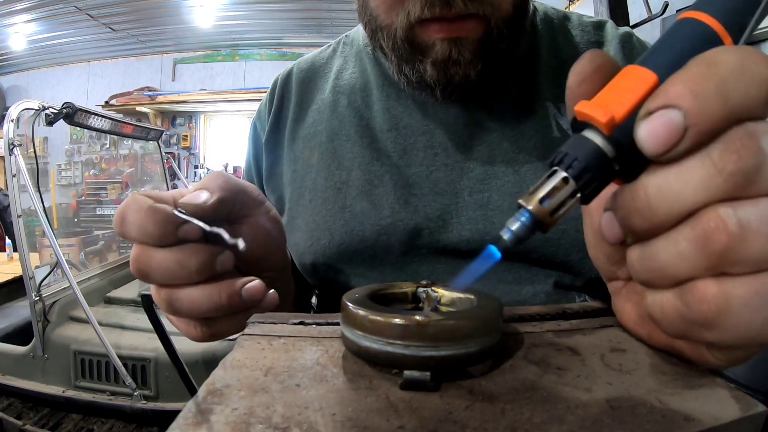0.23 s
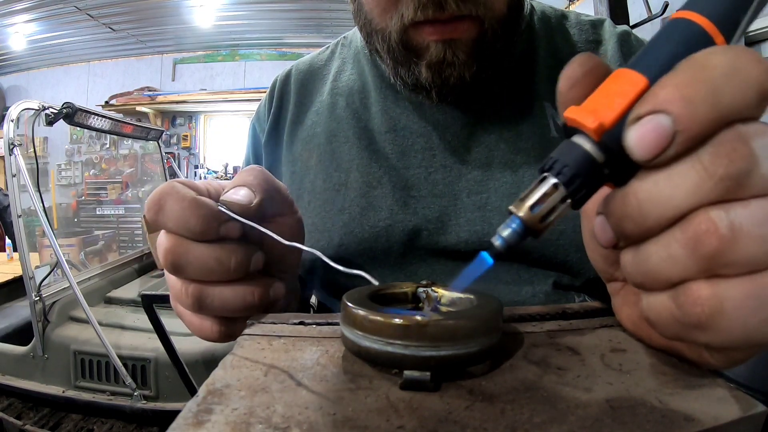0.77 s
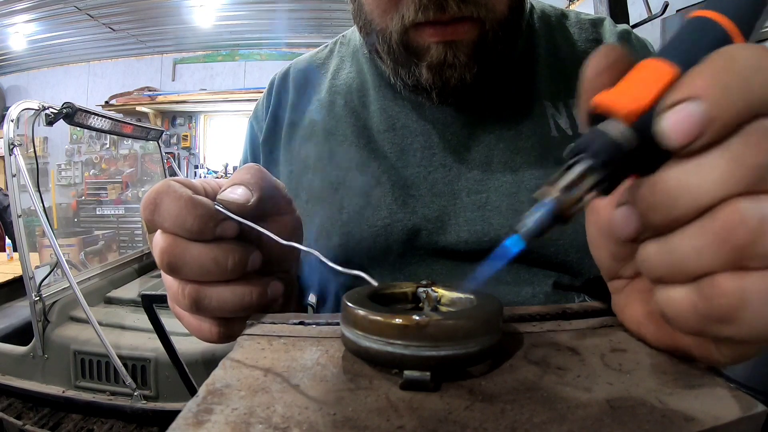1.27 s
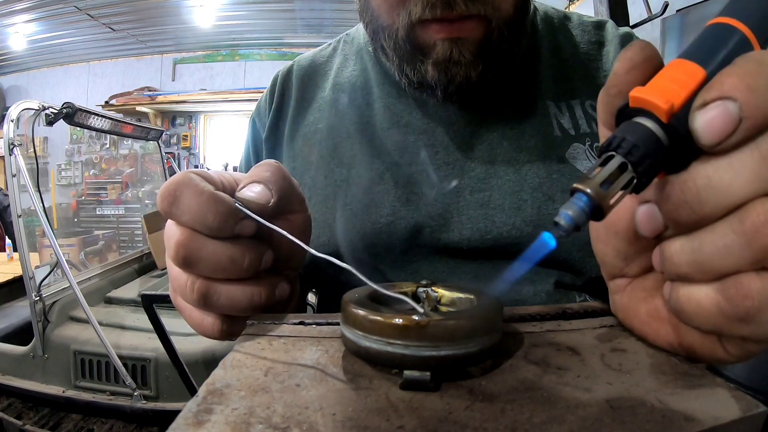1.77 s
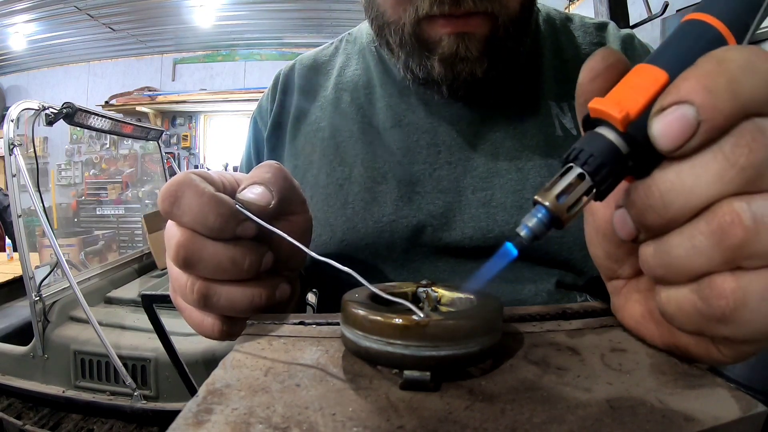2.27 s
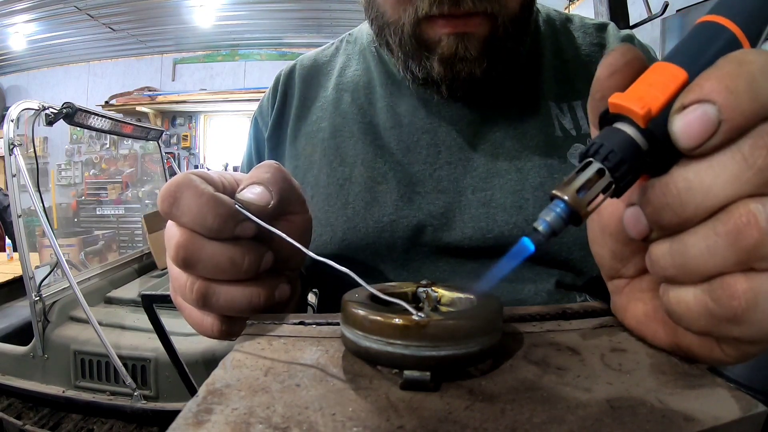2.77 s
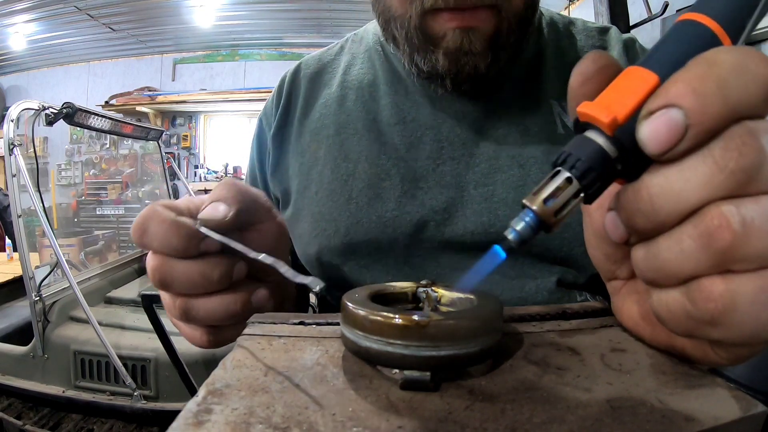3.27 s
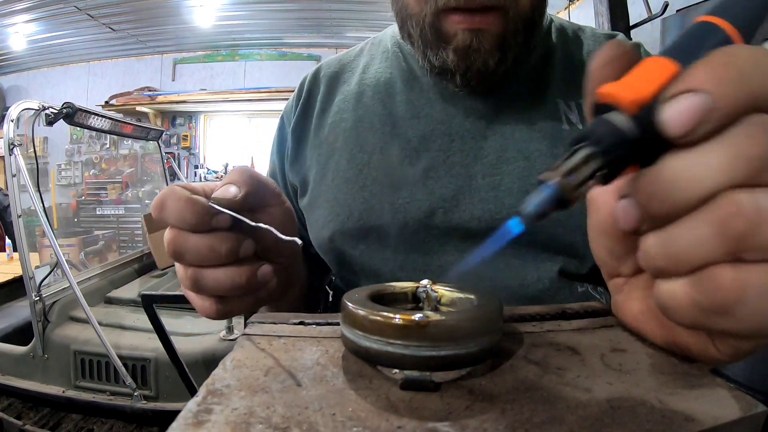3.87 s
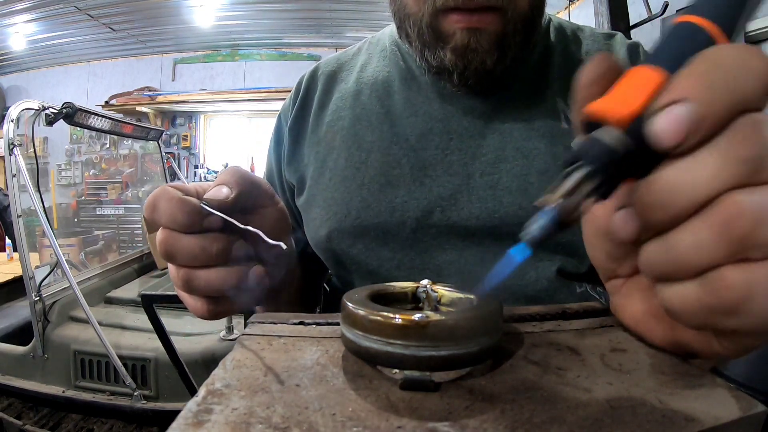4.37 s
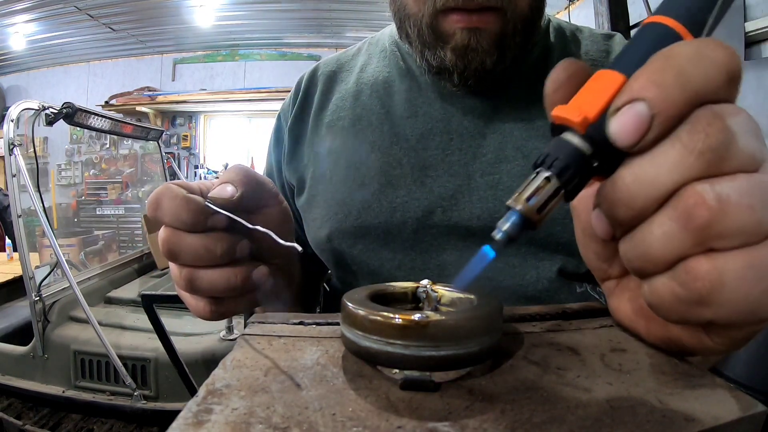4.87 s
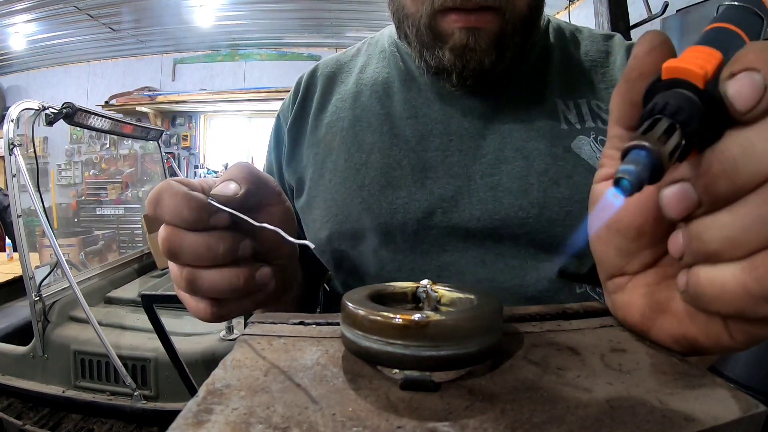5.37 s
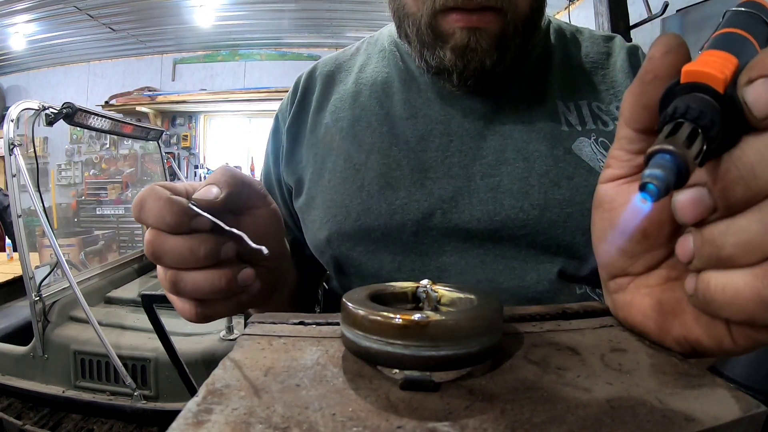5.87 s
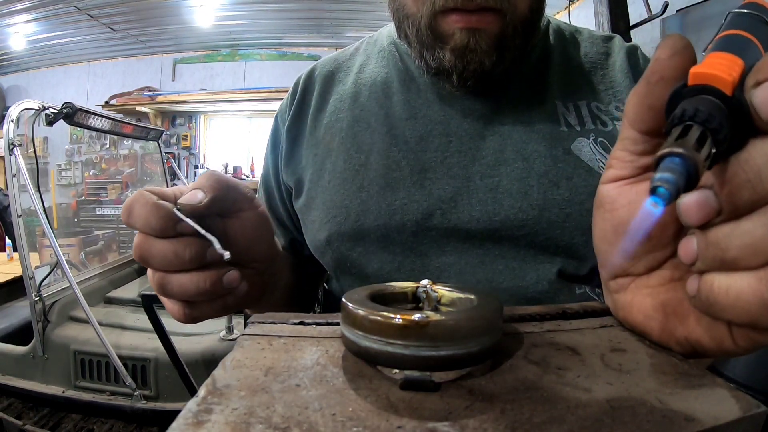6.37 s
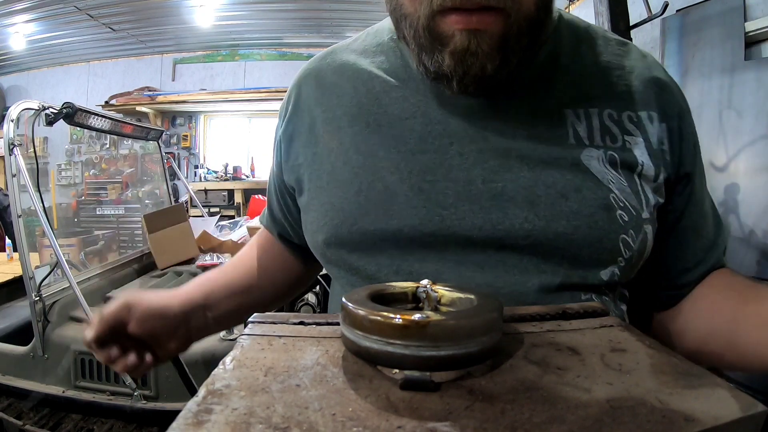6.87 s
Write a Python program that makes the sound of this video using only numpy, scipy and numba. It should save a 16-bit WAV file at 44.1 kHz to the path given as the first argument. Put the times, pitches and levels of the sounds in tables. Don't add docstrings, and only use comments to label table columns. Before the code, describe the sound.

In a workshop with wide, soft air noise and a faint wavering heater hum, a torch jet hisses steadily just beyond the microphone. One crisp pop snaps early. The hiss changes tone with each movement of the hand, grows fuller when the nozzle turns toward the microphone, then swings right and becomes much quieter. Cloth brushes, and a dull double thud on the wooden bench closes it.

```python
import sys
import numpy as np
from scipy import signal
from scipy.fft import rfft, irfft
from scipy.io import wavfile
from scipy.ndimage import uniform_filter1d, map_coordinates
from numba import njit

SR = 44100
rng = np.random.default_rng(int(sys.argv[2]) if len(sys.argv) > 2 else 0)


def linear_from_db(decibels):
    return 10 ** (np.asarray(decibels, float) / 20)


def transcribe(u):
    v = np.clip(np.atleast_2d(u).T, -1, 1)
    q = np.round(v * 32767).astype(np.int16)
    wavfile.write(sys.argv[1], SR, q)


N = 313548
T = np.arange(N) / SR


def level(x, db):
    return x * linear_from_db(db) / np.sqrt(np.mean(x ** 2))


def curves(table, along):
    key, *columns = np.transpose(table)
    return [np.interp(along, key, c) for c in columns]


def along_hz(table):
    hz, value = np.transpose(table)
    bins_hz = np.arange(N // 2 + 1) * SR / N
    return np.interp(np.log(bins_hz + 1), np.log(hz), value)


def colour(x, gain):
    return irfft(rfft(x) * gain, N)


@njit
def band(x, hz, width_hz):
    y, b, l = np.empty(len(x)), 0., 0.
    for i in range(len(x)):
        g, k = np.tan(np.pi * hz[i] / SR), width_hz / hz[i]
        v = (b + g * (x[i] - l)) / (1 + g * (g + k))
        b, l, y[i] = 2 * v - b, l + 2 * g * v, k * v
    return y


def steady_band(x, hz, width_hz):
    return band(x, np.full(N, float(hz)), float(width_hz))


def narrow_noise(hz, width_hz):
    return steady_band(steady_band(rng.standard_normal(N), hz, width_hz), hz, 2 * width_hz)


def notch(x, hz, width_hz, depth):
    return x - np.clip(depth, 0, 1) * band(x, hz, width_hz)


def later(x, ms):
    return map_coordinates(x, [np.arange(N) - ms * SR / 1000], order=3, mode="nearest")


def walk(rate):
    k = int(SR / rate)
    steps = np.repeat(rng.standard_normal(N // k + 1), k)[:N]
    return 1.9 * uniform_filter1d(uniform_filter1d(steps, k), k)


def sides(x, pan_db):
    return np.array([x * linear_from_db(pan_db / 2), x * linear_from_db(-pan_db / 2)])


def ring(s, db, hz, t60, rise_s):
    t = np.clip(T - s, 0, None)
    decay = np.exp(-np.log(1000) * t / t60)
    return linear_from_db(db) * (1 - np.exp(-t / rise_s)) * decay * np.sin(2 * np.pi * hz * t)


def shop_air():
    # (frequency [Hz], density [dB per Hz])
    air_tone = [(20, -16), (45, -22), (110, -29), (145, -8.5), (300, -15.5), (400, -17.5), (800, -14.5),
                (1000, -23.5), (1500, -22), (3000, -31.5), (8000, -28.5), (15000, -48)]
    # (frequency [Hz], share [0-1])
    likeness = [(40, 0.5), (70, 0.9), (200, 0.45), (500, 0.1), (1000, 0), (3000, 0.4)]
    alike = np.clip(along_hz(likeness), 0, 1)
    tone = linear_from_db(along_hz(air_tone))
    mid = colour(rng.standard_normal(N), tone * np.sqrt(1 + alike))
    side = colour(rng.standard_normal(N), tone * np.sqrt(1 - alike))
    return level(np.array([mid + side, mid - side]), -62) * linear_from_db(walk(2.58))


def heater():
    # (frequency [Hz], width [Hz], level [dB rms])
    hums = [
        (59, 14, -89),
        (172.9, 7.2, -65),
        (235.8, 47.5, -61.5),
    ]
    # (time [s], lower hum [dB], upper hum [dB])
    hum_swells = [(.45, 3, -1.5), (1.15, -3, 4.5), (2.28, 2, 1), (2.67, 4.5, 3.5), (3.0, -2.5, 8),
                  (4.3, 6.5, 4.5), (5.08, 8.5, -5.5), (5.77, 3, 1), (6.22, 3.5, 3.5), (6.62, 6, 5)]
    steady_s, swell_s = .35, 0.052
    s, *hum_swells_db = np.transpose(hum_swells)
    swell_shapes = np.exp(-.5 * ((T - s[:, None]) / swell_s) ** 2)
    out = 0
    for (hz, width_hz, db), swell_db in zip(hums, [0 * s, *hum_swells_db]):
        hum = narrow_noise(hz, width_hz)
        hum = hum / np.sqrt(uniform_filter1d(hum ** 2, int(steady_s * SR)) + 1e-12)
        out = out + level(hum * linear_from_db(swell_db @ swell_shapes), db)
    return out


def bench_bumps():
    # (time [s], level [dB peak], frequency [Hz], t60 [s], left minus right [dB])
    bumps = [(1.79, -57, 94, 0.14, 1), (1.99, -56.5, 85, 0.13, 0), (2.6, -53, 110, .1, 0),
             (2.85, -55, 120, 0.11, 0), (3.1, -62, 80, .12, 0), (3.22, -57, 75, .12, 0),
             (3.68, -58, 120, 0.089, 4), (3.75, -67, 121, .08, 0), (6.615, -53, 54, 0.18, -21),
             (6.625, -53, 110, 0.15, -6), (6.69, -57.5, 55, .15, -13), (6.78, -68, 57.7, 0.34, -13),
             (7.08, -40.5, 176, 0.19, -1), (7.097, -39, 206, 0.12, -2), (7.085, -46, 70, .15, 1)]
    return sum(sides(ring(s, db, hz, t60, 0.011), pan_db) for s, db, hz, t60, pan_db in bumps)


def rustles():
    # (time [s], level [dB rms], frequency [Hz], width [Hz], length [s], left minus right [dB])
    brushes = [
        (1.054, -46, 3600, 6900, 0.0011, 7),
        (1.065, -53, 1600, 2400, 0.0095, 9),
        (1.42, -56, 8000, 1800, 0.011, 4),
        (6.623, -67, 2050, 2500, 0.093, -10),
        (6.66, -64, 9500, 1300, 0.039, 10),
        (1.42, -76, 12500, 3500, .01, -2),
        (6.66, -80, 13700, 4000, .04, -4),
        (6.993, -59.5, 2500, 960, 0.0085, -15),
        (6.992, -73, 5000, 500, 0.0043, 0),
        (6.62, -60, 1900, 700, .008, -18),
    ]
    out = 0
    for s, db, hz, width_hz, length_s, pan_db in brushes:
        swell = np.exp(-.5 * ((T - s) / length_s) ** 2)
        out = out + sides(level(narrow_noise(hz, width_hz), db) * swell, pan_db)
    return out


def flux_pop():
    # (frequency [Hz], level [dB], t60 [s], later by [ms], left minus right [dB])
    pop_rings = [
        (2450, -13, 0.0036, 0.32, -3.5),
        (1170, -19.5, 0.0054, 0.13, -4),
        (1700, -29, 0.005, .1, 11),
        (7040, -35.5, .012, .8, 12),
        (211, -24, 0.015, 1.67, 1),
    ]
    pop_s = 1.0532
    pop = sum(sides(ring(pop_s + ms / 1000, db, hz, t60, 0.0004), pan_db)
              for hz, db, t60, ms, pan_db in pop_rings)
    return signal.sosfilt(signal.butter(2, 110, "high", fs=SR, output="sos"), pop)


def hand_pose():
    # (time [s], pose [0-3])
    moves = [(0.02, 1.05), (0.24, 0.06), (1.37, 0.015), (1.55, 0.96), (1.78, 0.72), (2.25, 0.29),
             (3.06, 0.35), (3.28, 0.06), (3.55, 0.11), (3.9, 1.4), (4.1, 0.056), (4.5, 0.067), (4.67, 1.22),
             (4.87, 0.1), (5.19, 0.066), (5.37, 2.0), (6.64, 2.04), (6.86, 2.99)]
    return uniform_filter1d(curves(moves, T)[0], size=1500) + .006 * walk(5)


def burner(pose):
    # (frequency [Hz], level [dB])
    jet_tone = [(80, -80), (300, -3), (900, -12), (1500, -9), (2200, -1), (4700, 1), (7500, 3),
                (9300, -5.5), (10300, -24.5), (12000, -26.5), (13700, -36), (15000, -42)]
    # (pose [0-3], first mode [Hz], its boost [dB], second
    # mode's shift [ratio], 2.3 kHz bench mode [dB])
    tube_modes = [(0, 2987, 0.4, 1.026, -20), (.3, 2904, 0, 1.0001, -23), (1, 2960, -0.6, 0.99, -13),
                  (2, 3144, 0.3, 1.034, 1), (2.8, 3120, 0, 1.05, 4), (3, 2840, -2.5, 1.06, -3)]
    # (frequency [Hz], width [Hz], level over the jet [dB])
    upper_modes = [(6210, 945, 10.5), (8430, 810, 4.5), (11210, 950, 12.5), (12700, 500, 15),
                   (14300, 430, 0)]
    tube_width_hz, tube_db = 376., 17.5
    warming_hz_per_s = 20.2
    jet = colour(rng.standard_normal(N), linear_from_db(along_hz(jet_tone)))
    first_hz, boost_db, shift, bench_mode_db = curves(tube_modes, pose)
    tube = linear_from_db(bench_mode_db) * steady_band(jet, 2295, 320)
    first = band(jet, first_hz + warming_hz_per_s * T, tube_width_hz)
    tube = tube + linear_from_db(tube_db + boost_db + 0.49 * walk(24.9)) * first
    for hz, width_hz, db in upper_modes:
        moving_hz = hz * shift ** (hz < 7000)
        tube = tube + linear_from_db(db + hz / 7000 * walk(12)) * band(jet, moving_hz, float(width_hz))
    return level(jet + tube, 0)


def echoes(hiss, pose, is_left):
    # (pose [0-3], left port [ms], bench [ms], ring [ms], hand to left [ms], hand to right [ms])
    paths = [(0, 0.018, 0.77, 0.273, 1.005, .96), (.3, 0.019, 0.486, 0.288, 1.12, 1),
             (.6, 0.02, 0.5, 0.291, 1.3, 1), (1, 0.017, 0.51, 0.31, 1.66, 1), (2, .026, .59, .189, .8, .85),
             (3, 0.089, 0.5, 0.2, 0.82, 0.76)]
    shares = [(0, 0.16, 0.28, 0.059), (.3, 0.027, 0.5, 0.13), (.6, 0.045, 0.5, 0.051), (1, 0.1, 0.2, 0.055),
              (2, .15, .24, .05), (3, 0.091, 0.32, 0.084)]
    away_s, away_share, away_ms, away_ms_per_s = 6.75, 0.51, 1.506, 2.53
    lag_ms, bench_ms, brass_ms, left_hand_ms, right_hand_ms = curves(paths, pose)
    bench, brass, hand = curves(shares, pose)
    if is_left:
        bench_ms, hand_ms = bench_ms + .015, left_hand_ms
    else:
        lag_ms, hand_ms = 0 * lag_ms, right_hand_ms
    x = later(hiss, lag_ms) + bench * later(hiss, lag_ms + bench_ms)
    x = x + brass * later(hiss, lag_ms + brass_ms) + hand * later(hiss, lag_ms + hand_ms)
    arm_ms = away_ms - away_ms_per_s * np.clip(T - away_s, 0, None)
    return x + away_share * np.clip(pose - 2.1, 0, 1) * later(hiss, lag_ms + arm_ms)


def ring_hollow(x, pose, is_left):
    # (pose [0-3], low dip [Hz], depth [0-1], high dip [Hz], depth [0-1])
    main_dips = [(0, 5700, 1, 6950, 1), (.15, 5000, 0.35, 7000, 1), (.3, 3970, 0.8, 6820, 0.47),
                 (.6, 3680, 1, 6870, 1), (1, 3620, 0.03, 6230, 0.5), (2, 4920, 0.16, 6100, 0.8),
                 (3, 4840, 0.4, 5560, 0.9)]
    # (pose [0-3], lower dip [Hz], depth [0-1], upper dip [Hz], depth [0-1])
    side_dips = [(0, 5040, 0.7, 9330, 0.5), (.3, 4820, 1, 9300, 0), (.6, 4720, 0.9, 8250, 0.9),
                 (1, 5070, 0, 8130, 0.9), (2, 4560, .65, 7650, .6), (3, 4270, 0.4, 6850, 0)]
    shift_hz, shade = (100, .35) if is_left else (0, 1)
    low_hz, low, high_hz, high = curves(main_dips, pose)
    x = notch(x, low_hz, 620., low)
    x = notch(x, high_hz + shift_hz, 480., shade * high)
    lower_hz, lower, upper_hz, upper = curves(side_dips, pose)
    x = notch(x, lower_hz, lower_hz.mean() / 11.1, lower)
    return notch(x, upper_hz, upper_hz.mean() / 11.1, upper)


def shop_return(pose):
    # (frequency [Hz], level under the direct hiss [dB])
    diffuse = [(1500, -10), (3000, -21), (5000, -23), (8500, -15), (11000, -4)]
    return colour(burner(pose), linear_from_db(along_hz(diffuse)))


def torch():
    # (pose [0-3], level [dB], left minus right [dB], flame roar [dB])
    loudness = [(0, -46, 2.5, -12), (.3, -46.5, 2, -8), (.6, -45, 1.3, -23), (1, -45.5, 0, -7),
                (2, -43, 1.9, -17), (2.2, -44, -3, -9), (3, -55.5, -7.5, -10)]
    # (frequency [Hz], level [dB])
    left_colour = [(1000, -13), (2200, -3), (3100, -5), (3800, -4.5), (6000, -1.5), (7000, -1), (8400, -5),
                   (10000, 1), (14000, -39)]
    pose = hand_pose()
    db, pan_db, roar_db = curves(loudness, pose)
    roar = level(steady_band(rng.standard_normal(N), 680, 450), 0)
    hiss = burner(pose) + roar * linear_from_db(roar_db - 17.5)
    arm_shade = 0.79 * (pose - 2.1)
    ports = []
    for is_left in (True, False):
        x = ring_hollow(echoes(hiss, pose, is_left), pose, is_left)
        x = x + shop_return(pose)
        ports.append(notch(x, np.full(N, 11600.), 5000., arm_shade))
    left = colour(ports[0], linear_from_db(along_hz(left_colour)))
    return np.array([left * linear_from_db(db + pan_db / 2), ports[1] * linear_from_db(db - pan_db / 2)])


def scene():
    return shop_air() + heater() + bench_bumps() + rustles() + flux_pop() + torch()


def band_limit(x):
    return signal.sosfilt(signal.butter(12, 15150, fs=SR, output="sos"), x)


def record(dry):
    wet = signal.sosfilt(signal.butter(2, 45, "high", fs=SR, output="sos"), dry)
    return band_limit(wet)


dry = scene()
out = record(dry)
transcribe(out)
```